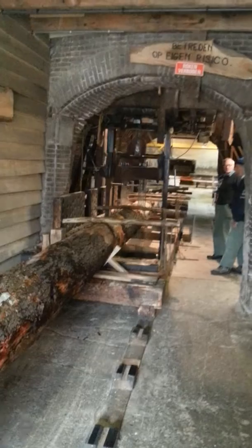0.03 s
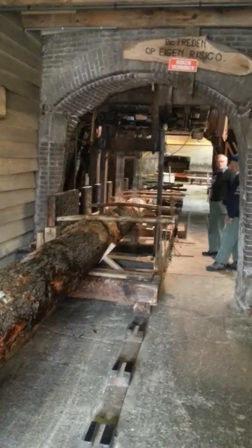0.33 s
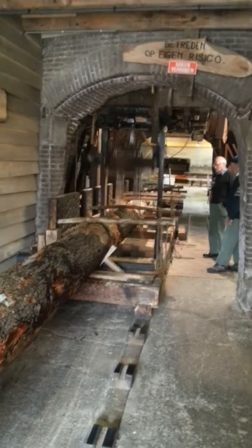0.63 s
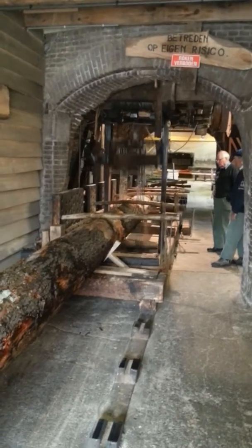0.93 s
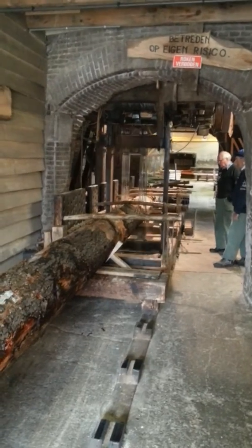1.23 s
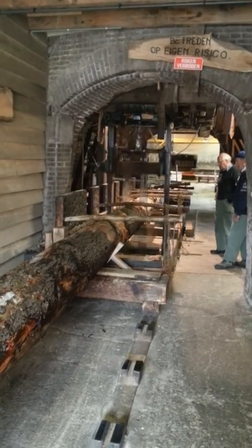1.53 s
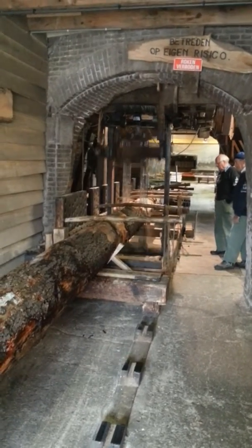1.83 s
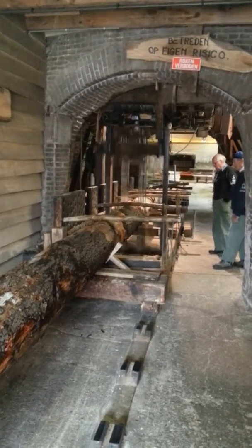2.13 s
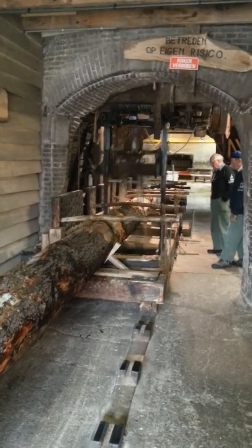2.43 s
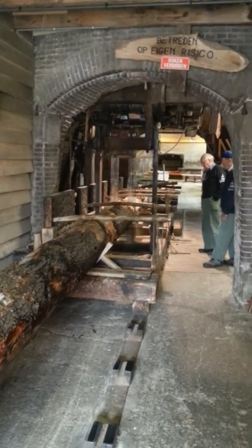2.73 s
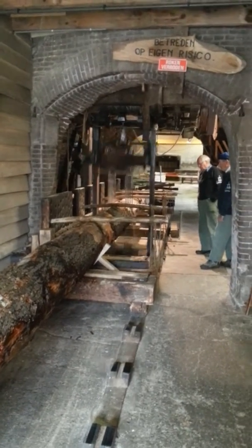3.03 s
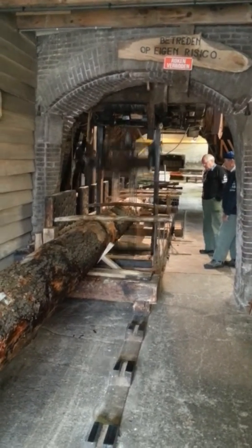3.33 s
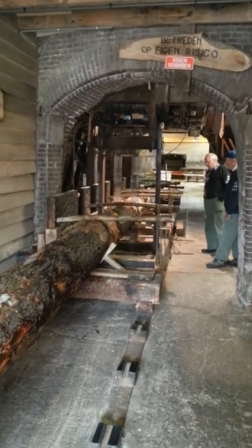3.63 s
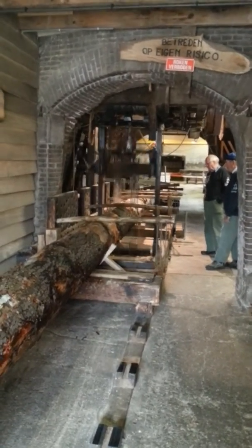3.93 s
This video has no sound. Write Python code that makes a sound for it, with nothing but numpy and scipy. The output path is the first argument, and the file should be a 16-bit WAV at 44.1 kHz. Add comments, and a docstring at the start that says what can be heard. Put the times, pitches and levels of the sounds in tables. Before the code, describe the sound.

Steady rasping strokes of a frame saw tear through a log and scrape back over thudding machinery inside a sawmill. Wood cracks once early on, a guide squeaks faintly, and the rumble swells toward the end.

```python
"""In a brick sawmill, a frame saw works through a log, about two strokes a second.
On each downstroke the teeth rasp, the wood tears and the frame rings; going up, the blades scrape back.
The drive rumbles and thuds at each turn, a dry guide squeaks thinly, and a piece of wood cracks once.
Twice the teeth catch with a bright spit, and a heavier rumble builds near the end."""
import sys
import numpy as np
from scipy import signal
from scipy.fft import rfft, irfft
from scipy.io import wavfile

SR = 44100
rng = np.random.default_rng(int(sys.argv[2]) if len(sys.argv) > 2 else 0)


def to_wav(sig):
    """Store sig (one row per channel, or 1-D mono) as 16-bit WAV at the path in sys.argv[1].

    Samples outside -1..1 are clipped; the rate is SR.
    """
    pcm = np.clip(np.atleast_2d(sig), -1, 1) * 32767
    pcm = np.round(pcm).astype(np.int16)
    wavfile.write(sys.argv[1], SR, pcm.T)  # frames by channels


N = 176400
T, HZ = np.arange(N) / SR, np.fft.rfftfreq(N, 1 / SR)

# each stroke's start and how much louder its parts are: t/s, rasp/dB, tear/dB, ring/dB, upstroke/dB
STROKES = [(-.04, -.5, -.5, 0, 0), (.433, 0, -.5, -1, 0), (.916, 0, -.5, 0, 0), (1.393, -.6, -.5, 0, 0),
           (1.873, 0, 1, 1, -.5), (2.357, .3, 1.3, -.5, .5), (2.833, -.3, 1, 0, 0),
           (3.317, -.3, -.5, -.5, .5), (3.798, -1, -.5, -.5, 0)]


def amp(db):
    """Turns decibels into a number to multiply by."""
    return 10 ** (np.asarray(db) / 20)


def unit(x):
    """Scales a signal to an average size (rms) of 1."""
    return x / np.sqrt(np.mean(x ** 2) + 1e-20)


def read(points, hz):
    """Looks up a table by frequency, sliding between its rows."""
    f, value = np.transpose(points)
    return np.interp(np.log(hz + 1), np.log(f), value)


def colour(x, spectrum, edge_db_per_octave=-30):
    """Sets how strong each frequency is, fading beyond the table's ends."""
    octaves_outside = abs(np.log2((HZ + 1) / np.clip(HZ + 1, spectrum[0][0], spectrum[-1][0])))
    gain = amp(read(spectrum, HZ) + edge_db_per_octave * octaves_outside)
    return unit(irfft(rfft(x) * gain, N))


def wander(rate_hz):
    """A smooth random wobble."""
    return unit(irfft(rfft(rng.standard_normal(N)) * np.exp(-(HZ / rate_hz) ** 2), N))


def tone(hz, width_hz, waver_hz=25):
    """A ringing note whose pitch wavers."""
    cycles = np.cumsum(hz + width_hz * wander(waver_hz)) / SR
    return np.sqrt(2) * np.sin(2 * np.pi * (cycles + rng.random()))


def pair(x):
    """Mixes two unrelated signals into a left and right that agree in the bass."""
    # how alike the two sides are: f/Hz, likeness (0 to 1)
    likeness = [(30, .9), (70, .97), (125, .95), (250, .74), (500, .62), (750, .4), (1050, 0), (14000, 0)]
    a, b = rfft(x)
    same = read(likeness, HZ)
    mid, side = a * np.sqrt((1 + same) / 2), b * np.sqrt((1 - same) / 2)
    return irfft(np.array([mid + side, mid - side]), N)


def room_noise(spectrum):
    """Noise that fills the building."""
    return colour(pair(rng.standard_normal((2, N))), spectrum)


def linger(level, tail_db, t60_s):
    """The mill's echo adds a tail to a loudness curve, fading 60 dB in t60_s."""
    keep = np.exp(-np.log(1e6) / (t60_s * SR))
    tail = signal.lfilter([1 - keep], [1, -keep], level ** 2)
    return np.sqrt((level ** 2 + amp(tail_db) ** 2 * tail) / (1 + amp(tail_db) ** 2))


def arch(x, echo_db=-7, spread_s=.04, count=24):
    """Adds quick echoes off the brick arch."""
    echoes = sum(rng.choice([-1, 1]) * np.roll(x, int(rng.random() * spread_s * SR))
                 for _ in range(count))
    return x + amp(echo_db) * echoes / np.sqrt(count)


def each_stroke(shape, levels_db):
    """A loudness curve that rises, sags and fades at every turn of the crank."""
    delay, attack, hold, sag, release = shape
    level = np.zeros(N)
    for (start, *_), db in zip(STROKES, levels_db):
        t = T - start - delay
        gate = np.clip(t / attack, 0, 1) * np.clip(1 - (t - attack - hold) / release, 0, 1)
        level += np.sin(gate * np.pi / 2) ** 2 * amp(db + sag * np.clip(t - attack, 0, 1))
    return level


def blows(events, rise_s, t60_s):
    """A loudness curve for blows that rise fast and die away."""
    return sum(np.clip((T - start) / rise_s, 0, 1) * amp(db - 60 * np.maximum(T - start, 0) / t60_s)
               for start, db in events)


def splinters(spectrum, per_s, spread_db):
    """Snapping wood fibres make dense, uneven clicks on the left and right."""
    sides = []
    for _ in range(2):
        clicks = rng.standard_normal(N) * (rng.random(N) < per_s / SR)
        sizes = amp(spread_db * np.minimum(rng.exponential(1, N), 4))
        sides.append(arch(clicks * sizes))
    return colour(pair(sides), spectrum)


def blades():
    """Teeth rasp and tear fibres going down, and scrape along the cut going up."""
    # tone colours of rasping, tearing and scraping back: f/Hz, level/dB
    rasp_colour = [(800, -30), (3000, -17), (3700, -15), (4050, -7.5), (4600, -9), (5700, -5.5),
                   (6550, 1.5), (7200, -4), (8400, -12.3), (9200, -11), (10500, -18.5), (12300, -26),
                   (14000, -46)]
    tear_colour = [(200, -14), (600, -1), (900, -1), (1080, 1), (1350, 1.5), (1750, -4.5), (2200, 0),
                   (2800, -4.5), (3400, -6), (5000, -8), (9000, -24)]
    back_colour = [(300, -12), (700, -3), (950, -2), (1250, 1.5), (1750, -5.5), (2200, 0), (2900, -7),
                   (3700, -9), (4000, 0), (4700, -2.5), (5500, 0), (6550, 6), (7400, -1.5), (8400, -9),
                   (9100, -5), (10300, -19), (12000, -33), (13000, -56)]
    # their swells in a stroke: delay/s, rise/s, hold/s, sag/(dB/s), fade/s
    rasp_shape = (-.028, .06, .07, -68, .095)
    tear_shape = (-.02, .066, .055, -14, .105)
    back_shape = (.166, .098, .035, -38, .14)
    _, rasp_db, tear_db, _, back_db = np.transpose(STROKES)
    flicker = amp(.4 * wander(70))
    rasp = splinters(rasp_colour, per_s=16000, spread_db=1.3)
    rasp *= linger(each_stroke(rasp_shape, rasp_db), tail_db=-2.5, t60_s=.45)
    tear = splinters(tear_colour, per_s=8000, spread_db=1.4)
    tear *= linger(each_stroke(tear_shape, tear_db), tail_db=-2.5, t60_s=.65)
    back = splinters(back_colour, per_s=10000, spread_db=1.7)
    back *= linger(each_stroke(back_shape, back_db), tail_db=-2.5, t60_s=.55)
    return flicker * (amp(-14.3) * rasp + amp(-22) * tear + amp(-22.1) * back)


def frame():
    """The cut shakes the log and rings the frame, which slides back with a wooden rumble."""
    # the frame's ringing notes: f/Hz, waver/Hz, level/dB
    notes = [(299, 2.5, -27.4), (322, 3, -32.5), (476, 10, -38), (517, 12, -38), (540, 7, -32.7),
             (764, 7, -38.5)]
    # tone colours of the shaking log and sliding frame: f/Hz, level/dB
    log_colour = [(90, -30), (170, -6), (250, 0), (350, 0), (430, -3), (535, 2.5), (620, -2), (690, -9),
                  (790, -6), (1000, -16), (2000, -30)]
    slide_colour = [(130, -20), (265, -1), (340, -5), (410, 0), (470, -3), (550, 2), (700, -6), (820, -6),
                    (1200, -24)]
    # swells in a stroke: delay/s, rise/s, hold/s, sag/(dB/s), fade/s
    ring_shape = (-.012, .036, .075, -3, .11)
    log_shape = (-.012, .028, .08, -18, .15)
    slide_shape = (.2, .07, .04, -20, .12)
    _, _, _, ring_db, back_db = np.transpose(STROKES)
    ring = sum(amp(db) * tone(hz, width) for hz, width, db in notes) * each_stroke(ring_shape, ring_db)
    shake = amp(-24.7 + .9 * wander(50)) * room_noise(log_colour) * each_stroke(log_shape, ring_db)
    slide = amp(-26.5) * room_noise(slide_colour) * each_stroke(slide_shape, back_db)
    return ring + shake + slide


def drive():
    """Machinery rumbles throughout, with a dull thud at each end of the stroke."""
    # tone colours of the steady rumble, bottom thud and heavier rumble: f/Hz, level/dB
    rumble_colour = [(20, -24), (45, -12.5), (88, -14), (118, 0), (165, 0), (270, -2.5), (400, -6.5),
                     (700, -9.5), (820, -7.5), (950, -14), (1300, -13.5), (1750, -18.5), (2300, -15.5),
                     (3400, -23), (4100, -18), (6200, -17), (8500, -31), (9500, -31), (11000, -52)]
    bottom_colour = [(80, -34), (116, -3), (150, -2), (195, 1), (270, -4), (360, -14), (700, -32)]
    heavy_colour = [(70, -25), (130, -4), (220, -2), (340, 1), (560, -2.5), (800, -8), (1400, -18),
                    (3000, -34)]
    # swells of the two thuds: delay/s, rise/s, hold/s, sag/(dB/s), fade/s
    bottom_shape = (.138, .055, .07, -22, .07)
    top_shape = (.365, .035, .03, -36, .13)
    # the heavier rumble's late build: t/s, level/dB
    build = [(0, -25), (2.8, -18), (3.2, -8), (3.38, -1), (3.6, 0), (3.72, -2), (3.86, 2), (4, 0)]
    even_db = np.zeros(len(STROKES))
    rumble = amp(-27.6) * room_noise(rumble_colour) * amp(.8 * wander(15))
    bottom = amp(-27.2) * room_noise(bottom_colour) * each_stroke(bottom_shape, even_db)
    top = amp(-32) * tone(hz=117, width_hz=6) * each_stroke(top_shape, even_db)
    build_db = np.interp(T, *np.transpose(build))
    heavy = room_noise(heavy_colour) * amp(-24.7 + build_db + 1.4 * wander(30))
    return rumble + bottom + top + heavy


def squeaks():
    """A dry guide sings briefly on one thin note."""
    # squeaks: t/s, length/s, level/dB
    events = [(.07, .07, -34), (.655, .04, -31), (1.02, .09, -32), (3.41, .1, -33), (3.51, .09, -32),
              (3.94, .06, -33.5)]
    level = sum(amp(db) * np.sin(np.pi * np.clip((T - start) / length, 0, 1))
                for start, length, db in events)
    return arch(tone(hz=5545, width_hz=52, waver_hz=130)) * linger(level, tail_db=-6, t60_s=.3)


def crack():
    """Wood splinters in a quick run of snaps."""
    # tone colour of cracking wood: f/Hz, level/dB
    crack_colour = [(200, -10), (500, -1), (1000, -2.5), (1500, 0), (2200, 3), (2800, -.5), (3350, 2.5),
                    (4600, -5), (7000, -10), (10000, -27)]
    # snaps: t/s, level/dB
    snaps = [(.677, -16), (.688, -11), (.725, -20.5), (.76, -22.5)]
    level = linger(blows(snaps, rise_s=.008, t60_s=.14), tail_db=1.5, t60_s=.5)
    return splinters(crack_colour, per_s=6000, spread_db=1.8) * level


def bites():
    """On two strokes the teeth catch at once, with a bright spit."""
    # tone colour of the spit: f/Hz, level/dB
    spit_colour = [(4000, -14), (6500, 0), (8000, -2), (10000, -8), (14000, -19)]
    # the teeth catching: t/s, level/dB
    catches = [(1.397, -17), (2.838, -17)]
    return splinters(spit_colour, per_s=8000, spread_db=1.5) * blows(catches, rise_s=.008, t60_s=.16)


def scene():
    """The saw, with its hiss mostly on the right, plus the cracking wood."""
    # the saw's left-right balance: f/Hz, left minus right/dB
    balance = [(30, -7), (65, -3.5), (125, -.2), (500, 0), (1100, 1.4), (2300, .8), (3500, -2), (5000, -5),
               (6500, -7.5), (8000, -5), (9100, -7.5), (11000, -6)]
    side_gains = np.array([amp(read(balance, HZ)), np.ones(len(HZ))])
    side_gains /= np.sqrt(np.mean(side_gains ** 2, axis=0))
    saw = blades() + bites() + frame() + drive() + squeaks()
    return irfft(rfft(saw) * side_gains, N) + crack()


def record(dry):
    """Rounds off the tallest peaks, then cuts the highest treble."""
    ceiling, cutoff_hz = .95, 13800
    rounded = dry / (1 + (dry / ceiling) ** 8) ** (1 / 8)
    lowpass = signal.firwin(511, cutoff_hz, window=("kaiser", 9), fs=SR)
    return signal.oaconvolve(rounded, lowpass[None], "same")


dry = scene()
out = record(dry)
to_wav(out)
```